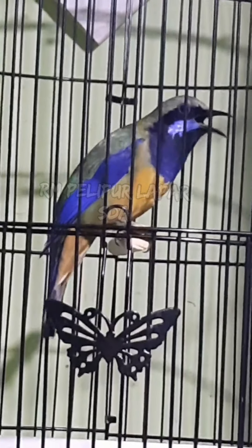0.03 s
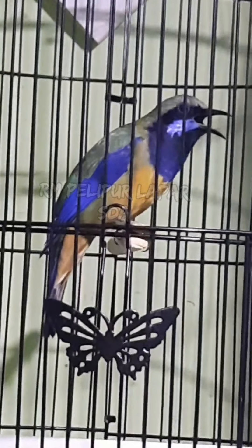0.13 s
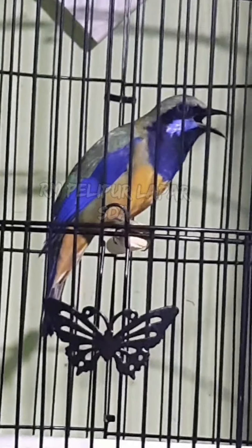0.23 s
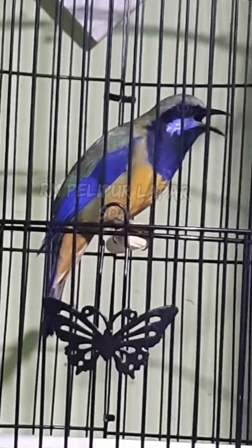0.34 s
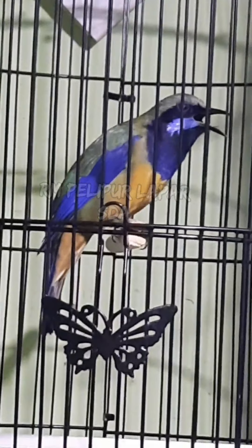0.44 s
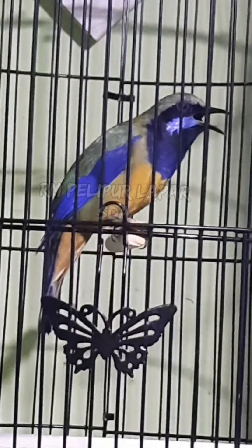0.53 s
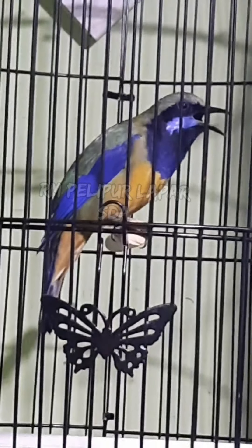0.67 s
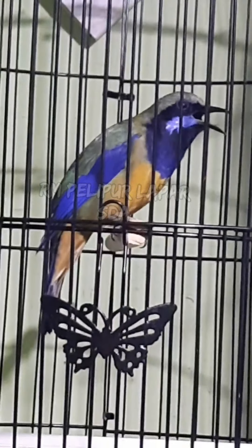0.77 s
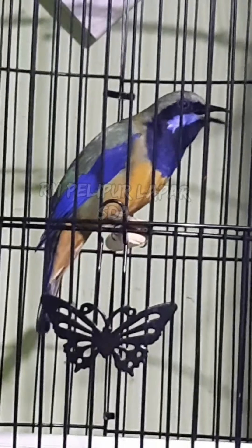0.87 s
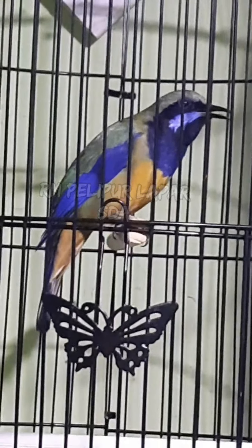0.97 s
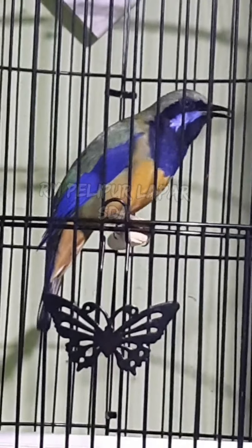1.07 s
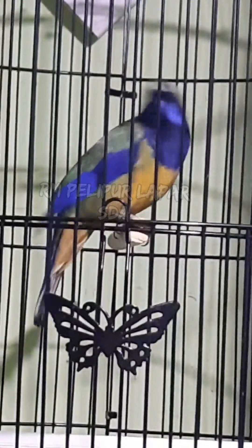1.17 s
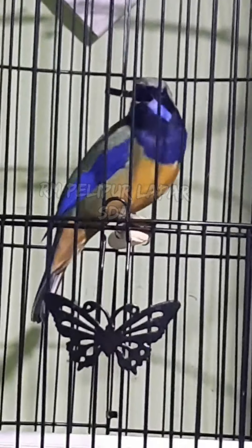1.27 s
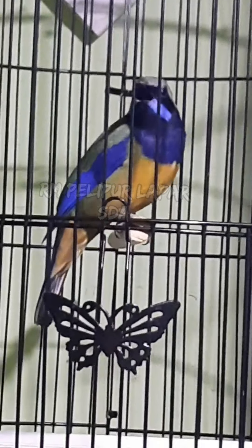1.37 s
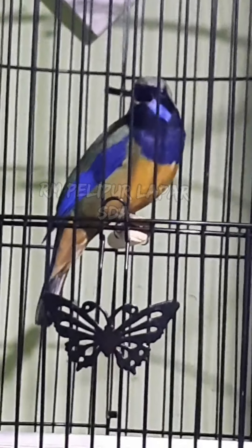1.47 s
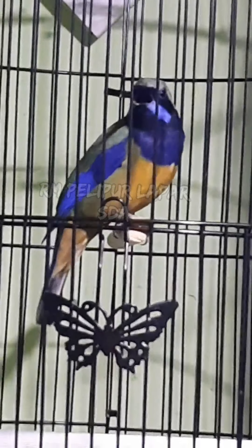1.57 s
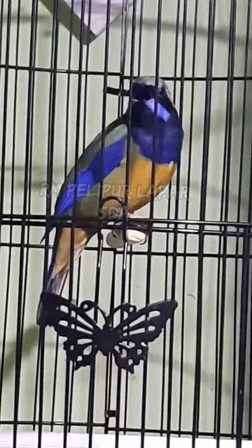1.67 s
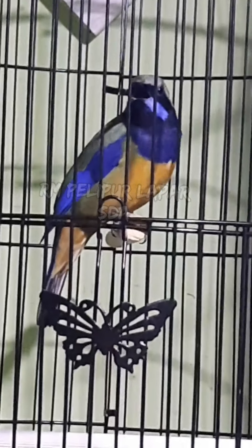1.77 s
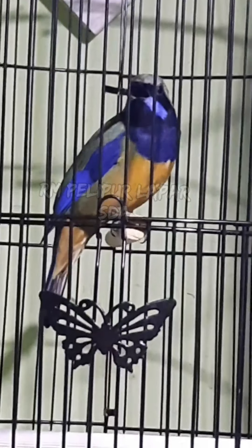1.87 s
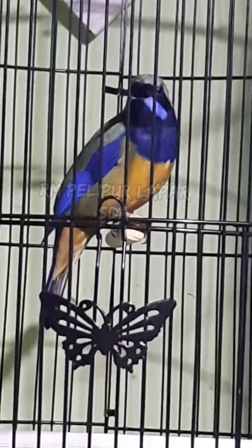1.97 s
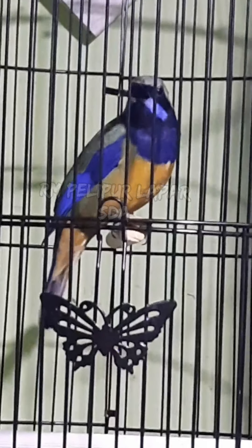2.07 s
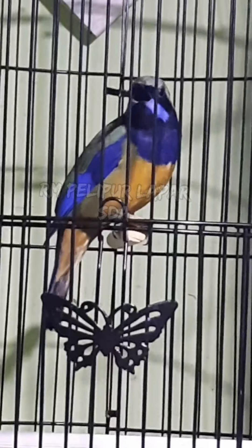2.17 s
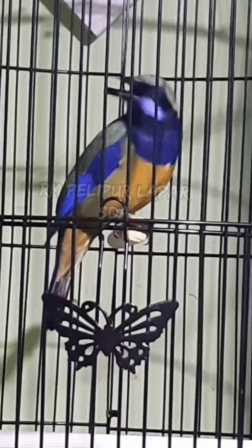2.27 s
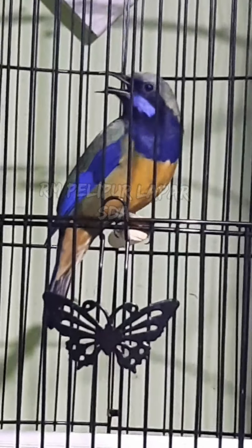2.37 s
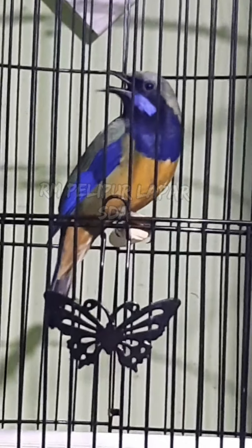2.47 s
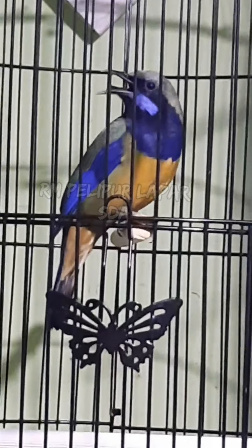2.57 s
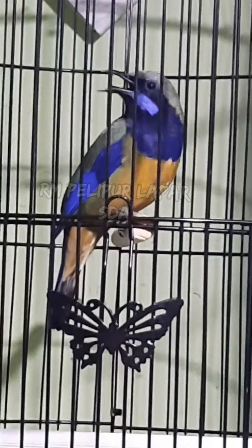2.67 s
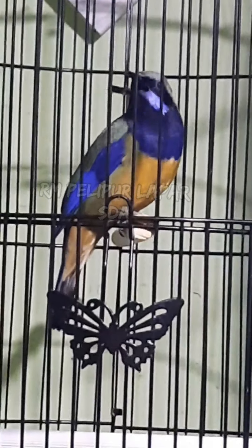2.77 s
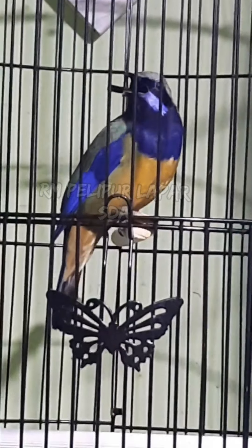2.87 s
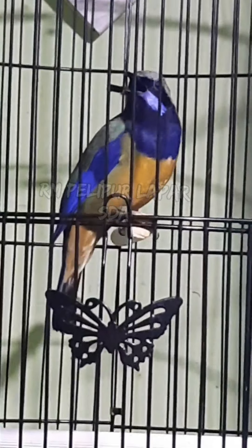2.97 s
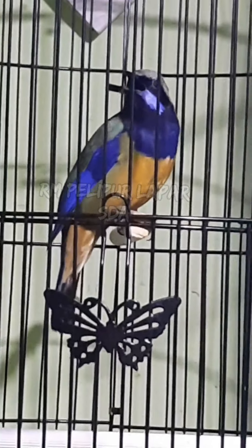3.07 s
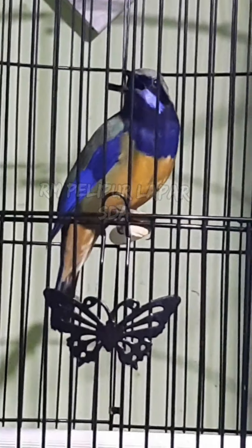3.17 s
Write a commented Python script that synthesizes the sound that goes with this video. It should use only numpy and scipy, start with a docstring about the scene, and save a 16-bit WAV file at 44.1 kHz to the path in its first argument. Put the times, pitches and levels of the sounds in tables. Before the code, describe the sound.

Fast, high bird chips slow into a long run of down-slurred whistles, with some hollow knocks and distant traffic.

```python
"""A leafbird in a wire cage in a small, hard-walled room; traffic rumbles and drones outside throughout.
The bird rattles off harsh rising chips, its syrinx membranes buzzing through the throat resonance,
pauses, and chips again. From 2.1 s it slows into a run of down-slurred whistles.
Between 2.6 and 5.5 s something hollow nearby is knocked seven times and rings dully.
At 7 s the chips return."""
import sys
import numpy as np
from scipy import signal
from scipy.io import wavfile

SR = 44100
rng = np.random.default_rng(int(sys.argv[2]) if len(sys.argv) > 2 else 0)


def output_pcm(signal):
    """Save a mono or channel-first signal as 16-bit PCM at the path in sys.argv[1].

    Samples are clipped to [-1, 1] before scaling.
    """
    pcm = np.clip(np.atleast_2d(signal).T, -1, 1) * 32767
    wavfile.write(sys.argv[1], SR, np.round(pcm).astype(np.int16))


N = 344862
TIME_S = np.arange(N) / SR


def from_db(db):
    return 10 ** (np.asarray(db) / 20)


def unit_rms(x):
    return x / np.sqrt(np.mean(x ** 2) + 1e-20)


def follow(rows, t):
    """Each column of a curve, interpolated at t."""
    times, *columns = np.transpose(rows)
    return [np.interp(t, times, column) for column in columns]


def gain_at(spectrum, hz):
    points_hz, db = np.transpose(spectrum)
    return from_db(np.interp(np.log(hz), np.log(points_hz), db))


def add(out, start_s, sound):
    at = round(start_s * SR) + np.arange(len(sound))
    inside = (at >= 0) & (at < N)
    out[at[inside]] += sound[inside]


def drift(t, rate_hz):
    """Random wander, spread about 1."""
    return np.interp((t - t[0]) * rate_hz, np.arange(4096), rng.standard_normal(4096))


def band(x, low_hz, high_hz):
    sos = signal.butter(2, [low_hz, min(high_hz, .45 * SR)], "band", fs=SR, output="sos")
    return signal.sosfilt(sos, x)


def stereo_noise(spectrum, waver_db, coherent_hz=620):
    """Wavering half-octave bands; the sides agree in the bass and part in the treble."""
    out, white = 0, rng.standard_normal((2, 2, N))
    edges_hz = 2 ** np.arange(np.log2(max(spectrum[0][0], 20)), np.log2(spectrum[-1][0]), .5)
    for k, (low_hz, high_hz) in enumerate(zip(edges_hz, edges_hz[1:])):
        mid, side = band(white[k % 2], low_hz, high_hz)
        hz = np.sqrt(low_hz * high_hz)
        coherence = .94 / (1 + (hz / coherent_hz) ** 2)
        gain = gain_at(spectrum, hz) * from_db(waver_db * drift(TIME_S, 9))
        out = out + gain * (np.sqrt(1 + coherence) * mid + np.sqrt(1 - coherence) * side * [[1], [-1]])
    return unit_rms(out)


# traffic swell: t/s, rumble level/dB, tyre level/dB
TRAFFIC_LEVELS = [(0.0, -39, -37.5), (1.22, -43, -37), (2.83, -44.5, -38), (3.48, -43, -45),
                  (3.9, -44, -45.5), (5.25, -51.5, -50.5), (5.49, -44, -48.5), (6.36, -49, -50.5),
                  (6.79, -42.5, -47), (7.82, -43, -41.5)]
# spectra of rumble, tyres and room air: f/Hz, relative density/dB
RUMBLE_SPECTRUM = [(15, -55.5), (25, 2), (43, -17), (75, 7.5), (102, 6), (124, 1.5), (193, -15.5),
                   (240, -32), (310, -65), (530, -120)]
TYRE_SPECTRUM = [(94, -32), (160, -6.5), (203, -14.5), (317, -1.5), (390, -3), (437, -10), (772, -11),
                 (950, -15), (1630, -17), (1900, -17), (2470, -54), (4180, -120)]
AIR_SPECTRUM = [(1700, 3), (3000, -10), (6000, -5.5), (15000, -22)]


def street():
    """Rumble and tyre noise swell and fade over the faint hiss of the room's air."""
    rumble_db, tyre_db = follow(TRAFFIC_LEVELS, TIME_S)
    rumble = from_db(rumble_db + 3) * stereo_noise(RUMBLE_SPECTRUM, waver_db=3)
    tyres = from_db(tyre_db + 1) * stereo_noise(TYRE_SPECTRUM, waver_db=2)
    air = from_db(-55) * stereo_noise(AIR_SPECTRUM, waver_db=2)
    return rumble + tyres + air


# response of throat and open beak: f/Hz, gain/dB
THROAT_RESPONSE = [(1500, -14), (2300, -8), (3200, -7.5), (4100, -8), (4800, -2), (5600, 2.5), (6600, -4.5),
                   (7900, -17), (9500, -5.5), (10800, -10), (12200, -12), (14500, -10), (17000, -3)]


def syrinx(t, pitch_hz, jitter, overtones, jitter_hz=2200):
    """One vibrating membrane: an unsteady harmonic tone, filtered by the throat."""
    pitch_hz = pitch_hz * (1 + jitter * drift(t, jitter_hz))
    phase = 2 * np.pi * (np.cumsum(pitch_hz) / SR + rng.random())
    return sum(gain * gain_at(THROAT_RESPONSE, k * pitch_hz) * np.sin(k * phase) * (k * pitch_hz < .45 * SR)
               for k, gain in enumerate([1, *overtones], 1))


# second membrane's sweep: t from chip crest/ms, f/Hz, level/dB
SWEEP_CURVE = [(-22, 2700, -14), (-14, 4100, 4.5), (-9, 5200, 3.5), (-10, 6700, -12), (-4, 6700, -1.5),
               (1.5, 2620, -29)]


def upsweep(t):
    """The second side of the syrinx rasps upward just ahead of a chip, never twice alike."""
    t_ms = 1000 * t + rng.normal(0, .8)
    pitch_hz, db = follow(SWEEP_CURVE, t_ms)
    inside_ms = np.minimum(t_ms - SWEEP_CURVE[0][0], SWEEP_CURVE[-1][0] - t_ms)
    fade = np.clip(inside_ms / 2 + 1, 0, 1)
    pitch_hz *= 1 + rng.normal(0, .0284)
    return fade * from_db(db) * syrinx(t, pitch_hz, jitter=.094, overtones=from_db([-12, -12]))


# chips: t/s, level/dB
CHIP_NOTES = [(0.013, -19.5), (0.082, -19.5), (0.139, -17), (.197, -18.5), (0.254, -19.5), (0.319, -21.5),
              (0.385, -19.5), (0.442, -18), (0.5, -21), (0.56, -20.5), (0.623, -18.5), (.681, -16),
              (0.743, -20.5), (0.796, -21), (1.243, -16), (1.299, -13.5), (1.362, -16), (1.426, -16),
              (1.488, -17), (1.546, -17), (1.602, -17), (1.673, -18), (1.735, -18), (1.802, -23.5),
              (1.868, -18.5), (1.926, -16.5), (2.003, -20), (2.095, -14.5), (6.963, -20), (7.009, -17),
              (7.068, -17.5), (7.136, -18), (7.191, -18), (7.252, -18.5), (7.312, -19), (7.37, -17.5),
              (7.429, -17.5), (7.509, -20), (7.572, -19), (7.637, -19), (7.697, -18), (7.759, -20.5),
              (7.818, -21.5)]
# course of one chip: t from crest/ms, f/top f, level/dB
CHIP_CURVE = [(-22, .38, -30), (-16, .46, -15), (-11, .56, -9), (-7, .72, -8), (-3.5, .93, -2),
              (0, 1.0, -1), (4, 1.02, -2), (9, 1.0, -16)]
# bouts of chips: start t/s, overtone level/dB
CHIP_BOUTS = [(0, -16.5), (1.2, -10.5), (6.9, -16.5)]


def chips(usual_db=-17.5, rise_hz_per_db=14, dulling_db_per_s=4.5):
    """A low buzz shoots up into the throat resonance; harder is higher and brighter, and each bout dulls."""
    out, t = np.zeros(N), np.arange(-.026, .012, 1 / SR)
    for crest_s, db in CHIP_NOTES:
        bout_s, bout_db = CHIP_BOUTS[sum(crest_s >= start_s for start_s, _ in CHIP_BOUTS[1:])]
        effort_db = db - usual_db
        top_hz = 4870 + rise_hz_per_db * effort_db
        bright_db = bout_db + .2 * effort_db - dulling_db_per_s * (crest_s - bout_s)
        pitch_ratio, shape_db = follow(CHIP_CURVE, 1000 * t * (1 + .08 * rng.normal()))
        envelope = from_db(shape_db) * signal.windows.tukey(len(t), .2)
        slack = np.clip(2 * (1 - pitch_ratio), 0, 1)
        jitter = .05 + .08 * slack   # slack membranes slap shut unevenly
        buzz, bright = from_db(-3) * slack, from_db(bright_db + 2)
        overtones = [bright + buzz, bright + .5 * buzz, bright * buzz, bright * buzz]
        voice = syrinx(t, top_hz * pitch_ratio, jitter, overtones)
        # irregular flapping rings the throat
        flapping = from_db(-6) * unit_rms(band(rng.standard_normal(len(t)), 3720, 5080))
        hiss = unit_rms(band(rng.standard_normal(len(t)), 5000, 15300))
        hiss *= from_db(bright_db - 5) * (buzz + .74)
        note = envelope * (voice + flapping + hiss) + from_db(-4) * upsweep(t)
        add(out, crest_s + t[0], from_db(db + 5) * note)
    return out


# distant engine tones: start t/s, end t/s, f/Hz, level/dB
ENGINE_TONES = [(.05, 1.505, 143.3, -39.5), (0.62, 1.69, 323, -37), (1.374, 3.49, 115, -35),
                (1.703, 3.2, 382.7, -39.5), (3.59, 5.006, 113.9, -41), (6.195, 7.8, 329, -47.5)]


def engines(waver=.0125, throb_db=2):
    """Far engines drone: each a wavering, throbbing sine that swells and fades."""
    out = np.zeros(N)
    for start_s, end_s, hz, db in ENGINE_TONES:
        swell = np.sqrt(np.sin(np.pi * np.clip((TIME_S - start_s) / (end_s - start_s), 0, 1)))
        phase = 2 * np.pi * np.cumsum(hz * (1 + waver * drift(TIME_S, 16))) / SR
        out += swell * from_db(db + throb_db * drift(TIME_S, 4.71)) * np.sin(phase)
    return out


# whistles: t/s, level/dB, nominal top f/Hz
WHISTLE_NOTES = [(2.09, -20, 5185), (2.164, -11, 5584), (2.248, -16, 5770), (2.326, -20, 5800),
                 (2.398, -17, 5770), (2.481, -18, 5940), (2.565, -16.5, 5830), (2.635, -13, 5770),
                 (2.714, -16, 5520), (2.785, -12.5, 5676), (2.87, -12.5, 5445), (2.943, -15, 5475),
                 (3.037, -13.5, 5650), (3.13, -13, 5660), (3.224, -13, 5556), (3.328, -13.5, 5580),
                 (3.424, -13.5, 5634), (3.524, -13, 5586), (3.626, -13.5, 5510), (3.719, -14, 5670),
                 (3.807, -15, 5670), (3.907, -15.5, 5860), (4.009, -10.5, 5400), (4.111, -13.5, 5540),
                 (4.207, -13, 5596), (4.311, -15, 5840), (4.413, -18.5, 5860), (4.518, -13.5, 5584),
                 (4.627, -12.5, 5505), (4.728, -13.5, 5590), (4.831, -12.5, 5504), (4.938, -13, 5580),
                 (5.048, -14, 5550), (5.145, -14.5, 5615), (5.25, -15, 5760), (5.357, -16, 5880),
                 (5.461, -13, 5820), (5.567, -15, 5750), (5.7, -15.5, 5756), (5.804, -19, 5780),
                 (5.913, -14.5, 5716), (6.022, -15, 5654), (6.13, -14, 5530), (6.236, -12, 5340),
                 (6.359, -14, 5440), (6.454, -12.5, 5416), (6.556, -16, 5487), (6.685, -16, 5670),
                 (6.806, -20.5, 5790)]
# scoop into a whistle: t from onset/ms, f/slur f, membrane slack (0-1)
SCOOP_CURVE = [(-14, .53, 1), (-8, .57, 0.83), (-4.5, .65, 0.68), (0, .87, 0.42), (1.5, 0.96, 0.13),
               (6, 0.97, 0.11)]


def whistles(usual_db=-12, usual_hz=5600, usual_gap_s=.103, strain_hz_per_db=160, arch_db=7, crest=.45):
    """A soft rasp scoops up, then whips down as a clear tone; strain makes it brighter and raspier."""
    out, t = np.zeros(N), np.arange(-.018, .05, 1 / SR)
    gaps_s = np.gradient([row[0] for row in WHISTLE_NOTES])
    scoop, slack = follow(SCOOP_CURVE, 1000 * t)
    buzz = from_db(1) * slack
    jitter = .022 + .098 * slack
    for (onset_s, db, top_hz), gap_s in zip(WHISTLE_NOTES, gaps_s):
        hurry = 1 - gap_s / usual_gap_s   # hurried notes are shorter and fall further
        length_s = min(.37 * gap_s, .039)
        end_hz = (.795 - .193 * hurry) * top_hz
        slide = np.clip(t / length_s, 0, 1.2)
        pitch_hz = scoop * (top_hz + (end_hz - top_hz) * slide) * (1 + .014 * drift(t, 159))
        strain_db = usual_db - db + (top_hz - usual_hz) / strain_hz_per_db   # high, weak notes strain
        rasp = from_db(strain_db - 7.5) * slack
        pressure = from_db(-arch_db * (2 * (slide - crest)) ** 2)
        gate = np.clip((t + .013) / .011, 0, 1) * np.clip((length_s - t) / .005 + .5, 0, 1)
        envelope = gate * (rasp + pressure * (1 - slack) ** 2)
        bright = from_db(.91 * strain_db - 25) * (.68 + np.sin(np.pi * np.minimum(slide, 1)))
        overtones = [bright * from_db(3) + buzz, bright * from_db(10) + .5 * buzz, .62 * buzz]
        voice = syrinx(t, pitch_hz, jitter, overtones, jitter_hz=1000)
        add(out, onset_s + t[0], from_db(db + 5) * envelope * voice)
    return out


# blows: t/s, level/dB, relative clatter/dB, relative thud/dB
KNOCK_BLOWS = [(2.612, -25.5, -32, -24), (3.164, -27.5, 0, 16), (3.854, -33.5, -7, -13),
               (4.837, -29, -18, 13), (5.325, -35.5, 3.5, -12), (5.392, -35, -20, 1),
               (5.463, -43, 21.5, -12)]
# modes of the hollow body: f/Hz, width/Hz, gain/dB
BODY_MODES = [(260, 73, 10.5), (385, 38, 14.5), (487, 38, -2), (575, 14.3, 11.5), (707, 40, 1),
              (854, 11, -53)]


def knocks(attack_s=.0062, decay_s=.029, min_width_hz=20):
    """A rattling contact rings a hollow body, with a thud below and clatter on top."""
    force, clatter, thud = np.zeros((3, N))
    t = np.arange(SR // 4) / SR
    envelope = np.minimum(t / attack_s, 1) * np.exp(-t / decay_s)
    for peak_s, db, clatter_db, thud_db in KNOCK_BLOWS:
        blow = from_db(db) * envelope * rng.standard_normal(len(t))
        add(force, peak_s - attack_s, from_db(10) * blow)
        add(clatter, peak_s - attack_s, from_db(clatter_db + 1) * blow)
        add(thud, peak_s - attack_s, from_db(thud_db + 6) * blow)
    body = np.zeros(N)
    for hz, width_hz, db in BODY_MODES:
        resonator = signal.iirpeak(hz, hz / max(width_hz, min_width_hz), fs=SR)
        body += from_db(db) * signal.lfilter(*resonator, force)
    return body + band(clatter, 500, 2360) + band(thud, 74, 204)


# echoes off the nearest walls: left t/ms, right t/ms, level/dB
WALL_ECHOES = [(1.75, 1.84, -7), (5.87, 6.14, -11)]


def room(x, t60_s=.25, build_s=.003, cage_decay_s=.0017, right_lag_ms=.27, right_cutoff_hz=12100):
    """Direct sound, two near walls, quick scatter from cage bars and tray, and a short, dense tail."""
    t, out = np.arange(SR // 3) / SR, []
    for side in range(2):
        tail, scatter = rng.standard_normal((2, len(t))) * (1 - np.exp(-t / build_s))
        tail *= from_db(-60 * t / t60_s)
        scatter *= np.exp(-t / cage_decay_s)
        response = from_db(3.16) * tail / np.linalg.norm(tail)
        response += from_db(-.5) * scatter / np.linalg.norm(scatter)
        response[round(side * right_lag_ms * SR / 1000)] += from_db(-7)   # direct path
        for *delay_ms, db in WALL_ECHOES:
            response[round(delay_ms[side] * SR / 1000)] += from_db(db)
        out.append(signal.fftconvolve(x, response)[:N])
    left, right = out
    right = signal.lfilter(*signal.butter(1, right_cutoff_hz, fs=SR), right)   # faces away: less treble
    return np.array([left, right])


# turns of the bird's head: t/s
TURNS_S = [1.1, 2.45, 3.0, 6.92]


def scene():
    """Bird and knocks share the room, whose reflections change at each head turn; traffic lies beneath."""
    sources = chips() + whistles() + knocks()
    pose = np.searchsorted(TURNS_S, TIME_S)
    indoors = sum(room(sources * (pose == k)) for k in np.unique(pose))
    background = engines() + street()
    return indoors * from_db([[0], [.2]]) + background * from_db([[.7], [-.7]])


def record(dry, ceiling=.95, cutoff_hz=15900):
    """Soft peak limiting, then a steep low-pass."""
    rounded = dry / (1 + (dry / ceiling) ** 8) ** (1 / 8)
    return signal.sosfilt(signal.ellip(12, .1, 80, cutoff_hz, fs=SR, output="sos"), rounded)


dry = scene()
out = record(dry)
output_pcm(out)
```